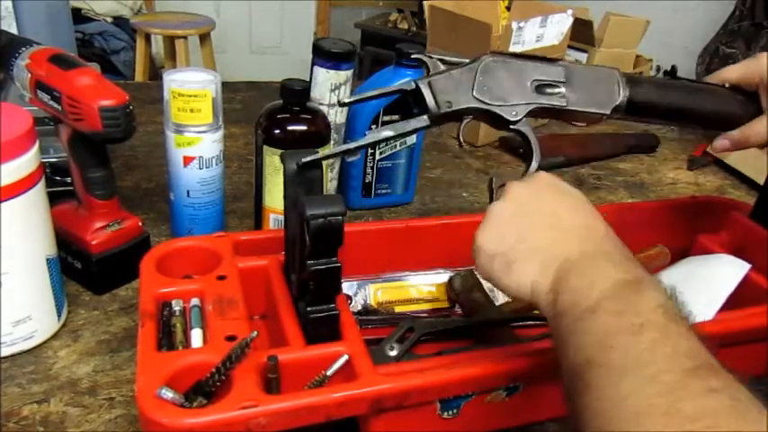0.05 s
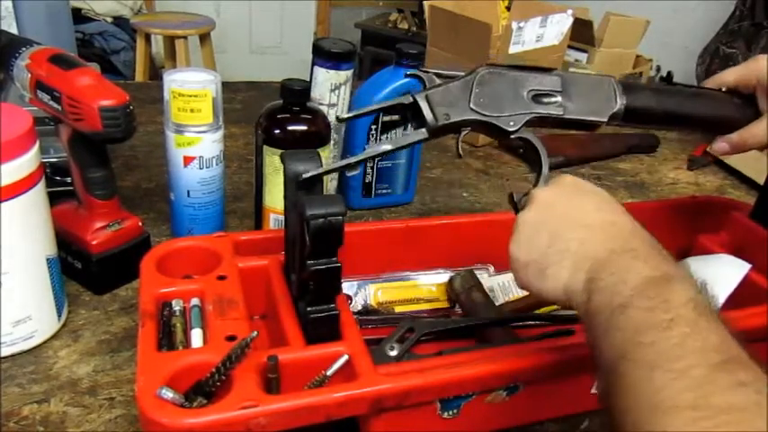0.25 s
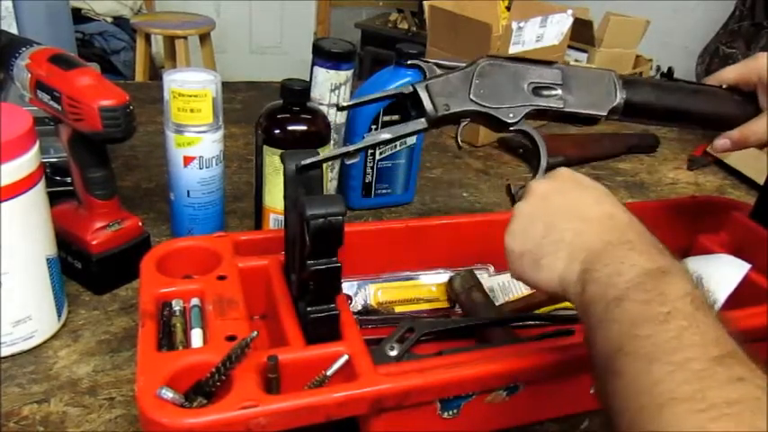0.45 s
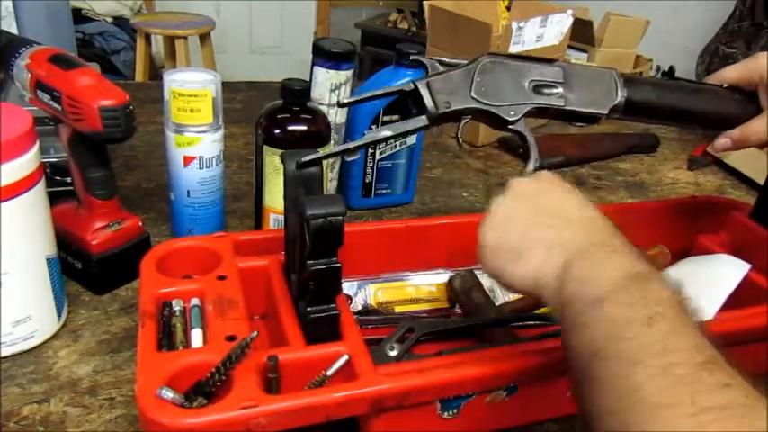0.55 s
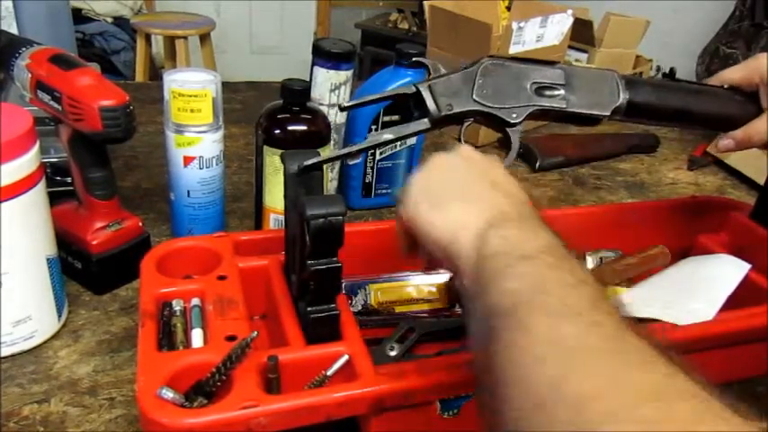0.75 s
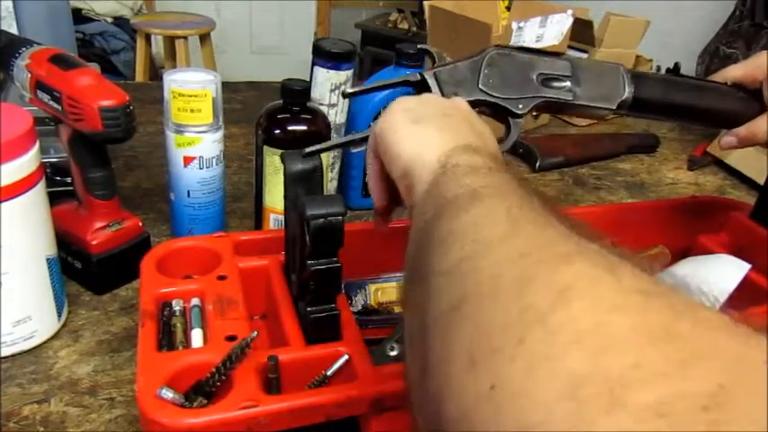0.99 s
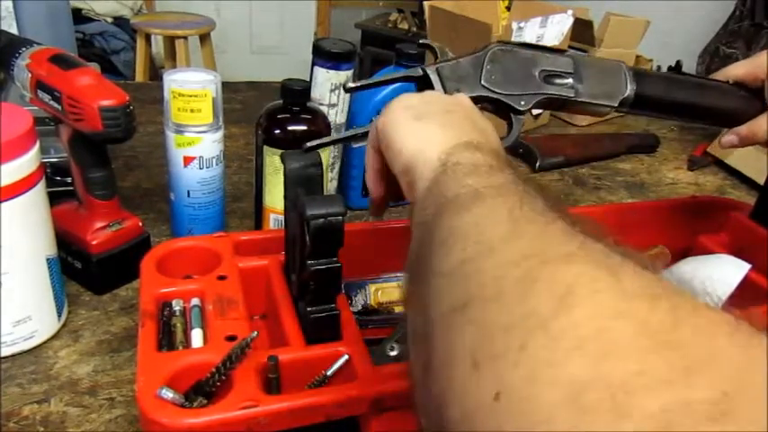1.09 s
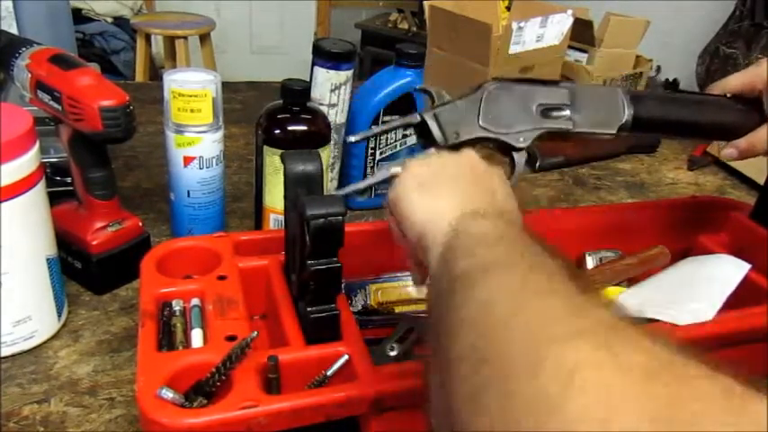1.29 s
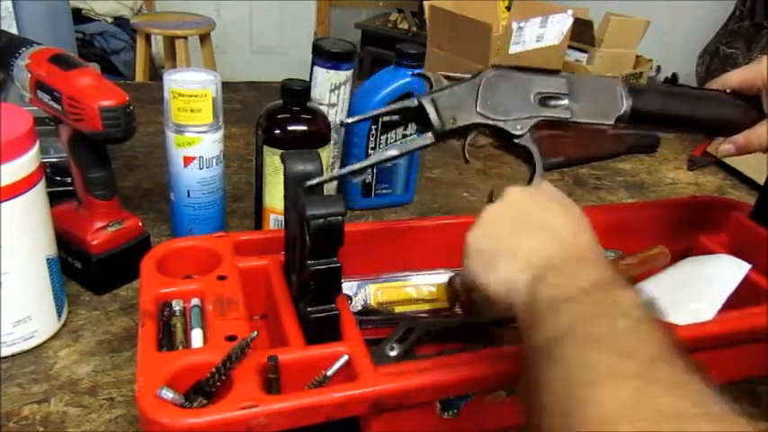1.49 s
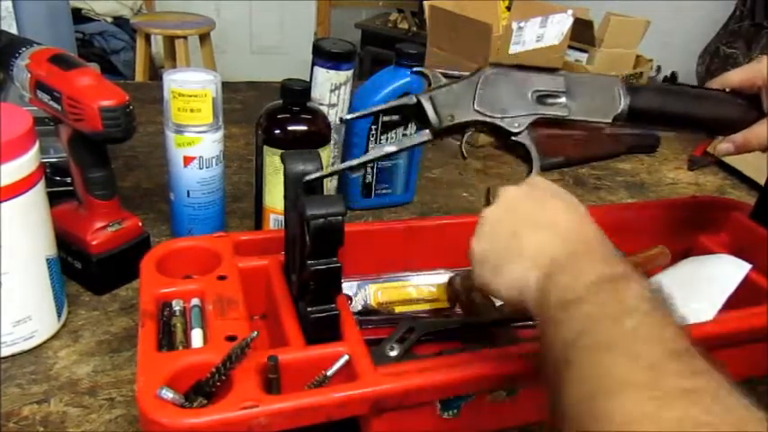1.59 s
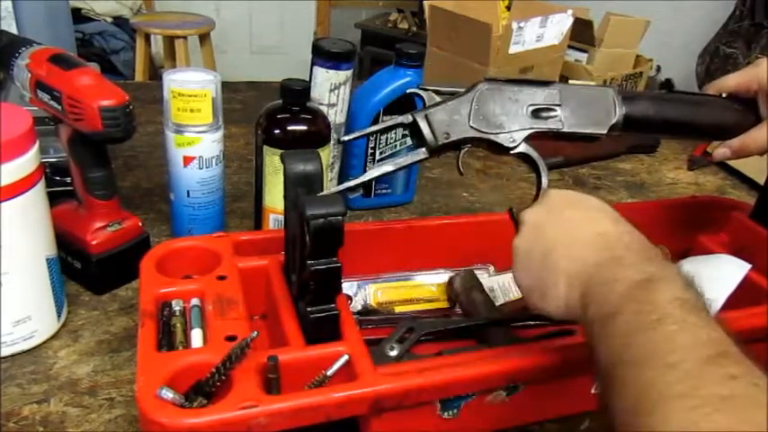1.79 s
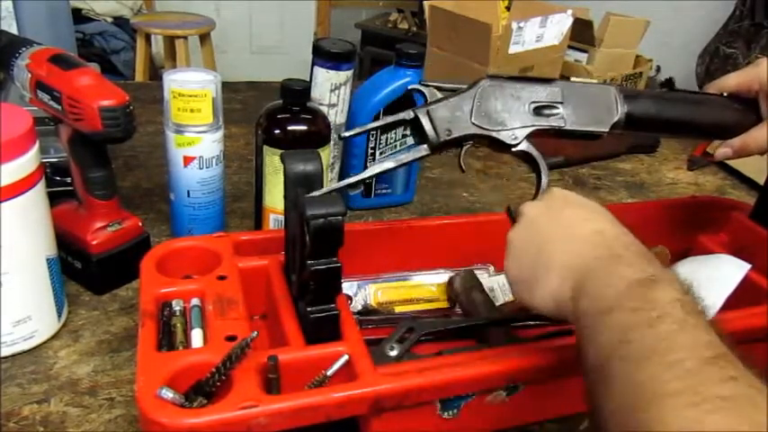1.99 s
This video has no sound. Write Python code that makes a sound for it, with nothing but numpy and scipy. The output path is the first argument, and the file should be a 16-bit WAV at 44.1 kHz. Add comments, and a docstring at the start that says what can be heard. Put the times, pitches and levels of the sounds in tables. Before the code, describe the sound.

A rifle's steel lever action is cycled by hand: a bright ringing slam, then clicks building to a harder clack, a lull, light ticks and a final slam, close microphone in a small hard room with faint fan hum.

```python
"""The steel action of a rifle, held over a plastic tool tray, is worked by hand in a small hard workshop.
Fan hum and room noise run throughout. Hard slams come at 0.2 s, ticks build from 0.57 s to a slam at 0.81 s,
and after a lull ticks from 1.26 s lead to the last slams at 1.7 s. Each blow is a noise burst that rings
the receiver's modes; other decaying modes give the lever's ring, the tray's boom and the stock's woody knock.
Random catches of sliding steel rasp between the blows, and tails of decaying noise answer from the room."""
import sys
import numpy as np
from scipy import signal
from scipy.fft import rfft, irfft, next_fast_len
from scipy.io import wavfile
from scipy.ndimage import map_coordinates

SR = 44100
rng = np.random.default_rng(int(sys.argv[2]) if len(sys.argv) > 2 else 0)


def decibels_to_gain(level_db):
    """Convert a level in decibels to a linear amplitude gain (20 dB per decade)."""
    exponent = np.asarray(level_db, float) / 20
    return 10 ** exponent


def waveform_to_disk(signal):
    """Save audio, clipped to [-1, 1], as 16-bit WAV at the path in sys.argv[1]."""
    frames = np.transpose(np.atleast_2d(signal))
    scaled = np.clip(frames, -1, 1) * 32767
    samples = np.round(scaled).astype(np.int16)
    wavfile.write(sys.argv[1], SR, samples)


N = 90404

# Ringing modes of the steel receiver. Each row: frequency in Hz, relative level in dB, t60 in seconds.
RECEIVER = [(1210, -14.5, 0.036), (2030, -20, 0.15), (2527, 12, 0.043), (2550, -22.5, 1),
            (2690, 11.5, 0.018), (2840, 0.5, 0.09), (3620, 9.5, 0.015), (3970, 5, 0.023), (4640, 4, 0.049),
            (5000, 4.5, 0.047), (7600, 9, 0.02), (9300, -0.5, .025), (9680, 5.5, 0.03), (10700, 4, 0.058),
            (10580, 1.5, 0.03)]
CRACK_OCTAVES = 1.53  # width of a blow's crack


def unit(x):
    """Scaled to rms 1."""
    return x / np.sqrt(np.mean(x ** 2) + 1e-20)


def along(points, hz):
    """Reads (Hz, value) points on a log frequency axis."""
    f, v = np.transpose(points)
    return np.interp(np.log(hz + 1), np.log(f + 1), v)


def curve(rows):
    """Straight lines through (seconds, value) rows, one value per sample."""
    return np.interp(np.arange(N) / SR, *np.transpose(rows))


def coloured(x, spectrum):
    """Filters x by a (Hz, dB) spectrum and scales it to rms 1."""
    size = next_fast_len(N + 8192)
    gain = decibels_to_gain(along(spectrum, np.fft.rfftfreq(size, 1 / SR)))
    return unit(irfft(rfft(x, size) * gain, size)[:N])


def add(track, s, sound):
    """Mixes a sound into the track at s seconds."""
    part = track[round(s * SR):][:len(sound)]
    part += sound[:len(part)]


def wobble(rate, count):
    """Smooth random curve, rate knots a second."""
    knots = rng.standard_normal(int(count * rate / SR) + 9)
    return map_coordinates(knots, [np.arange(count) * rate / SR])


def band(hz, centre_hz, octaves):
    """Gain of a bell-shaped band, steeper above its centre."""
    steeper_above = 1.42
    away = np.log2((hz + 30) / centre_hz) / octaves
    return decibels_to_gain(-6 * (away * np.where(away > 0, steeper_above, 1)) ** 2)


def ring(modes, centre_hz, rise_s, damp=1.0, octaves=2.4):
    """Decaying modes, those near the centre struck hardest; damp is the share of the free ring time left."""
    scatter_db, waver_rad = 2, 1.3  # level spread of each mode per blow, phase wander
    t = np.arange(SR // 2) / SR
    hz, db, t60 = np.transpose(modes)[:, :, None]
    gain = decibels_to_gain(db) * band(hz, centre_hz, octaves)
    gain = gain / gain.sum()
    gain = gain * decibels_to_gain(scatter_db * rng.standard_normal(hz.shape))
    wander = waver_rad * np.array([wobble(72, count=len(t)) for _ in modes])
    phase = 2 * np.pi * (hz * t + rng.random(hz.shape)) + wander
    decay = decibels_to_gain(-60 * t / (t60 * damp))
    return (gain * decay * np.sin(phase)).sum(0) * (1 - np.exp(-t / rise_s))


def air():
    """Room noise with slightly unsteady fan lines."""
    # Spectrum of the room noise. Each row: frequency in Hz, density in dB per Hz before levelling.
    noise_spectrum = [(25, 10), (60, -2.5), (120, -2), (200, -4), (400, -4.5), (700, -10.5), (1200, -12),
                      (2500, -16.5), (5000, -19.5), (9000, -26.5), (13000, -26.5), (15800, -33.5)]
    # Fan lines. Each row: frequency in Hz, level in dB relative to the room noise.
    fan_lines = [(295, -16), (351, -12.5), (468, -16.5), (1165, -19), (1588, -18.5), (11795, -24)]
    noise_db = -50.5
    t = np.arange(N) / SR
    fan = np.zeros(N)
    for hz, db in fan_lines:
        level = decibels_to_gain(db + 0.54 * wobble(4.1, count=N))
        fan += level * np.sin(2 * np.pi * hz * t + 0.35 * wobble(6.2, count=N))
    noise = coloured(rng.standard_normal(N), noise_spectrum)
    return decibels_to_gain(noise_db) * (noise + np.sqrt(2) * fan)  # the root brings sines of peak 1 to rms 1


def room(x):
    """Each frequency of the room's answer dies at its own speed; a new noise tail for every half second."""
    # Reverberation. Each row: frequency in Hz, t60 in seconds.
    reverb_times = [(100, 0.7), (1000, 0.47), (3000, 0.51), (7000, 0.47), (11000, 0.41), (14000, 0.29)]
    level_db, gap_s = -9, .004
    out = np.zeros(N)
    for start in range(0, N, SR // 2):
        hz, t, z = signal.stft(rng.standard_normal(SR), SR, nperseg=256)
        decay = decibels_to_gain(-60 * t / along(reverb_times, hz)[:, None])
        tail = signal.istft(z * decay, SR, nperseg=256)[1]
        tail = tail / np.linalg.norm(tail)
        add(out, start / SR + gap_s, signal.fftconvolve(x[start:start + SR // 2], tail))
    return decibels_to_gain(level_db) * out


def tray_and_stock():
    """Jolts boom the low modes of the tray or sound the stock's woody knock near 900 Hz."""
    # Low modes of the tray, with the stock's woody knock near 900 Hz.
    # Each row: frequency in Hz, relative level in dB, t60 in seconds.
    low_modes = [(103, -9, .09), (142, -2, .11), (160, 0, .11), (188, -5, .1), (300, -8, .08),
                 (365, -6, .1), (478, -6, .2), (880, -2, .03), (1050, -4, .02)]
    # Jolts to tray and stock. Each row: start in seconds, level in dB, centre of the struck modes in Hz.
    jolts = [(.045, -36.5, 139), (.204, -10.5, 864), (.208, -29, 350), (0.212, -14.5, 153),
             (0.252, -30, 167), (.59, -33, 197.6), (0.772, -22.5, 176), (0.8143, -3.5, 1024),
             (0.816, -21.5, 473), (0.851, -22.5, 197), (1.384, -29.5, 894), (1.392, -36.5, 900),
             (1.488, -32.5, 250), (1.64, -31.5, 203), (1.698, -8.5, 927), (1.703, -14.5, 287.4),
             (1.736, -22.5, 162)]
    out = np.zeros(N)
    for s, db, centre_hz in jolts:
        add(out, s, decibels_to_gain(db) * ring(low_modes, centre_hz, 0.011, octaves=0.41))
    return out


def rasp():
    """Tiny random catches of sliding steel, partly heard through the receiver's damped modes."""
    # How strongly the steel rasps over time. Each row: time in seconds, level in dB.
    slide = [(0, -61), (.14, -59.5), (.18, -51), (.2, -42.5), (.25, -47.5), (.55, -61), (.574, -43.5),
             (.579, -40), (.63, -45.5), (.68, -49.5), (.757, -50.5), (.766, -31.5), (.82, -51),
             (1.3, -79.5), (1.44, -55), (1.475, -50), (1.479, -37.5), (1.51, -41.5), (1.55, -76.5),
             (1.62, -83), (1.65, -48.5), (1.69, -40.5), (1.71, -28), (1.8, -62.5)]
    # Colour of the bare catches. Each row: frequency in Hz, density in dB per Hz before levelling.
    rasp_spectrum = [(290, -57.5), (500, -16), (1100, -5.5), (2500, -6), (3280, -9), (5000, -11.5),
                     (11100, -25), (15500, -42)]
    grains_per_s, grain_spread_db = 5000, 2.5
    caught = rng.random(N) < grains_per_s / SR
    strength = rng.standard_normal(N) * decibels_to_gain(grain_spread_db * rng.standard_normal(N))
    catches = caught * strength
    body = ring(RECEIVER, 5200, 0.0017, damp=.25)
    through_body = unit(signal.fftconvolve(catches, body)[:N])
    return decibels_to_gain(curve(slide)) * unit(coloured(catches, rasp_spectrum) + 0.7 * through_body)


def crack(centre_hz, contact_ms):
    """Steel meeting steel: a short burst of noise around a centre, as long as the contact."""
    rise_share = 0.26  # rise as a share of the contact
    t, hz = np.arange(2048) / SR, np.fft.rfftfreq(2048, 1 / SR)
    contacts = t * 1000 / contact_ms  # time counted in contacts
    spectrum = rfft(rng.standard_normal(len(t))) * band(hz, centre_hz, CRACK_OCTAVES)
    noise = unit(irfft(spectrum))
    return noise * (1 - np.exp(-contacts / rise_share)) * np.exp(-contacts ** 2) / 2


def action():
    """Every blow cracks and rings the receiver; the room hears each crack from all sides, as one even click."""
    # Slams and ticks. Each row: start in seconds, crack level in dB, centre of the crack in Hz,
    # contact in ms, receiver ring in dB relative to the crack level.
    blows = [(.058, -44, 2500, 2.5, -40), (.181, -24, 4000, 2.6, 1), (0.189, -32, 4470, 5.5, 3),
             (0.2022, 1, 10900, 1.7, 5.5), (0.2051, 4, 2840, 1.77, -19), (0.2075, 1, 7600, 8.4, -4.5),
             (.5655, -44, 2460, 2.2, -6), (0.5764, -22, 6860, 1.7, 0), (.589, -21.5, 2040, 1.5, -12),
             (.597, -24, 4020, 2.6, -4.5), (0.6024, -17.5, 3290, 4.2, 6.5), (0.6563, -20.5, 2900, 2.5, -2),
             (0.7626, -14.5, 7060, 2.5, 4), (0.7644, -11, 7000, 4.3, -9), (0.771, -5, 4860, 1.8, 4.5),
             (0.779, -13.5, 2800, 3.1, -6), (0.812, -3.5, 9280, 4.7, -22), (0.8133, 12, 5000, 3.8, -10.5),
             (0.8139, 1.5, 1520, 0.97, -21), (1.2556, -38.5, 4880, 4.3, 8), (1.3819, -32, 1875, 4.9, -20.5),
             (1.3909, -23.5, 1867, 2.45, -7), (1.447, -39.5, 2820, 4.7, 3), (1.4773, -20.5, 6460, 3, -1.5),
             (1.484, -21.5, 4100, 1.8, -14), (1.489, -25.5, 2800, 1.6, 3), (1.4951, -18.5, 3440, 2.2, -8.5),
             (1.5037, -28, 3560, 2.8, -26), (1.513, -35, 3500, 3.4, -8.5), (1.636, -24.5, 2470, 3.9, -23),
             (1.644, -32.5, 2500, 6.2, -20.5), (1.653, -26.5, 3456, 5.6, -8.5),
             (1.6762, -23, 3020, 2.3, -13.5), (1.685, -23.5, 4000, 2.9, -7.5),
             (1.688, -22, 8000, 2.5, -8.5), (1.6955, 6.5, 10300, 4.9, -9), (1.6973, 6.5, 3600, 1.6, -5),
             (1.7016, -7.5, 5090, 5.1, -2), (1.718, -6.5, 9100, 4.3, -10)]
    # Ringing modes of the lever. Each row: frequency in Hz, relative level in dB, t60 in seconds.
    lever_modes = [(4199, 1, .4), (4234, -7, .25), (5082, -3, .12), (7340, -16, .3), (7482, -3, .34),
                   (7510, -5, .3), (9351, -14, .3), (10460, -16, .15), (10860, -8, .27), (10896, -11, .22),
                   (11480, -16, .22), (13490, -7, .22), (14290, -16, .25)]
    # Blows that set the lever ringing. Each row: start in seconds, level in dB, centre of the struck modes
    # in Hz, share of the free ring time left by the grip.
    lever_rings = [(0.141, -42, 8000, 0.78), (0.2037, 2.5, 10700, 0.57), (0.208, -10.5, 6000, 1),
                   (0.344, -32.5, 3500, .3), (.603, -31.5, 6020, 0.14), (.657, -41, 8000, 0.24),
                   (0.765, -9.5, 12000, 0.053), (.771, -22.5, 8000, 0.086), (0.774, -9.5, 2000, 0.34),
                   (0.777, -4.5, 2000, 0.31), (.816, -20.5, 9000, 0.16), (1.478, -19.5, 8160, .12),
                   (1.497, -35, 7000, 0.18), (1.697, -10, 12000, 0.52)]
    near, rings, clicks = np.zeros(N), np.zeros(N), np.zeros(N)
    hz = np.fft.rfftfreq(1024, 1 / SR)
    for s, db, centre_hz, contact_ms, ring_db in blows:
        burst = decibels_to_gain(db) * crack(centre_hz, contact_ms)
        add(near, s, burst)
        click = np.fft.fftshift(irfft(band(hz, centre_hz, CRACK_OCTAVES)))
        click = click * np.linalg.norm(burst) / np.linalg.norm(click)  # as much energy as the burst
        add(clicks, s, click[448:])  # from 64 samples ahead of its peak
        add(rings, s, decibels_to_gain(db + ring_db) * ring(RECEIVER, centre_hz, 0.0003))
    for s, db, centre_hz, damp in lever_rings:
        add(rings, s, decibels_to_gain(db) * ring(lever_modes, centre_hz, 0.00067, damp))
    return near + rings, clicks + rings


def scene():
    """Steel, tray and stock, direct and through the room, over the room noise."""
    near, around = action()
    slide, thuds = rasp(), tray_and_stock()
    direct = near + slide + thuds
    reflected = room(around + slide + thuds)
    return (direct + reflected + air())[None]


def roll_off(x):
    """The treble ends steeply here."""
    return signal.sosfilt(signal.butter(12, 15910, fs=SR, output="sos"), x)


def record(dry):
    """Treble roll-off; gain control ducks at loud peaks and creeps back; clipping at full scale; a bass cut."""
    top_hz, low_hz = 13300, 90
    duck_from_db, duck_share, lag_s, back_db_per_s = -17.5, 0.82, 0.007, 9
    clip_hardness = 45
    dry = signal.lfilter(*signal.butter(4, top_hz, 'low', fs=SR), dry)
    lag = np.exp(-1 / (lag_s * SR))
    power = signal.lfilter([1 - lag], [1, -lag], dry ** 2)
    level_db = 10 * np.log10(power + 1e-12)
    # a running maximum on a rising slope holds each duck and lets it recover steadily
    slope_db = back_db_per_s * np.arange(N) / SR
    over_db = duck_share * np.maximum(level_db - duck_from_db, 0) + slope_db
    x = dry * decibels_to_gain(slope_db - np.maximum.accumulate(over_db, axis=1))
    x = x / (1 + np.abs(x) ** clip_hardness) ** (1 / clip_hardness)
    x = signal.lfilter(*signal.butter(2, low_hz, 'high', fs=SR), x)
    return roll_off(np.clip(x, -1, 1))


dry = scene()
out = record(dry)
waveform_to_disk(out)
```